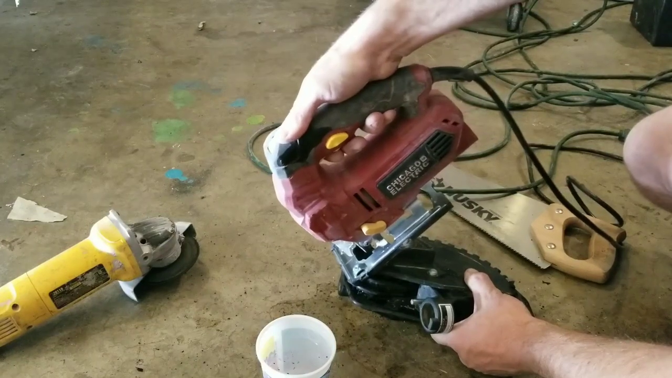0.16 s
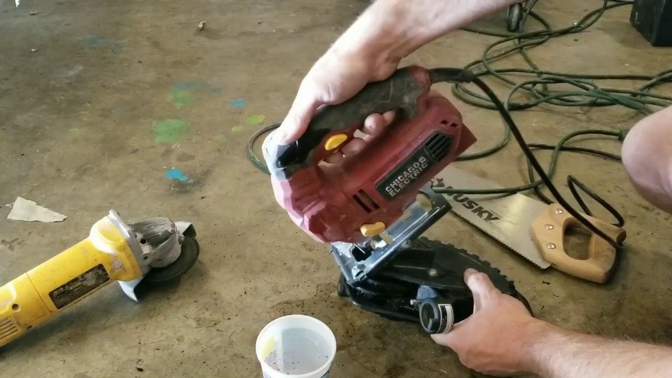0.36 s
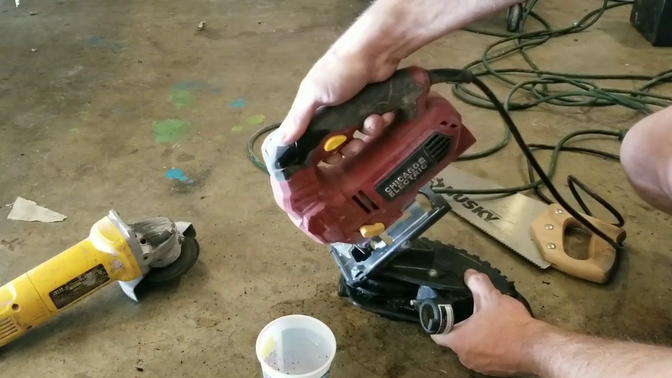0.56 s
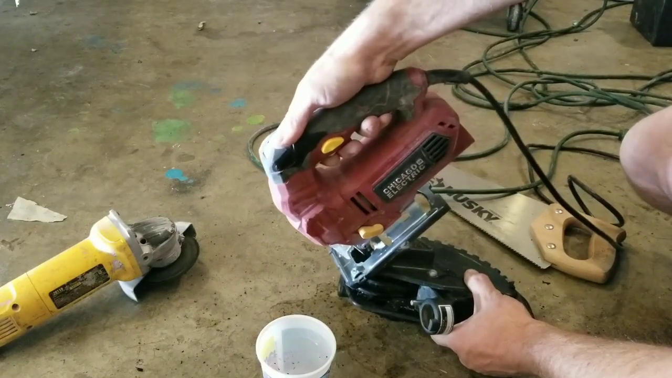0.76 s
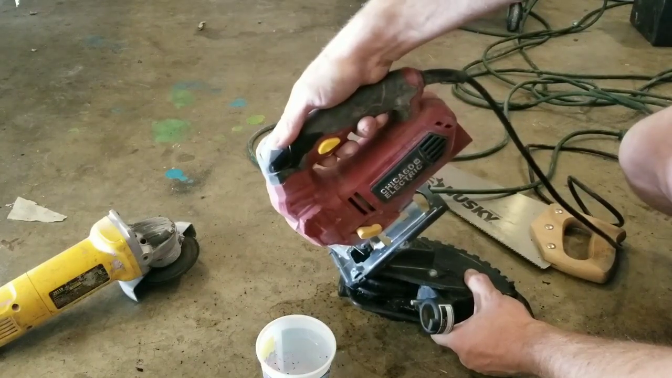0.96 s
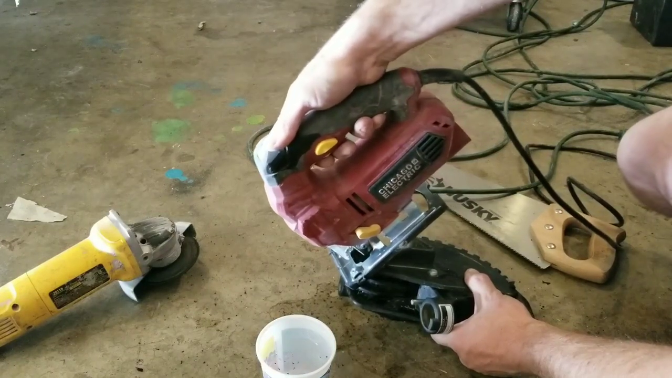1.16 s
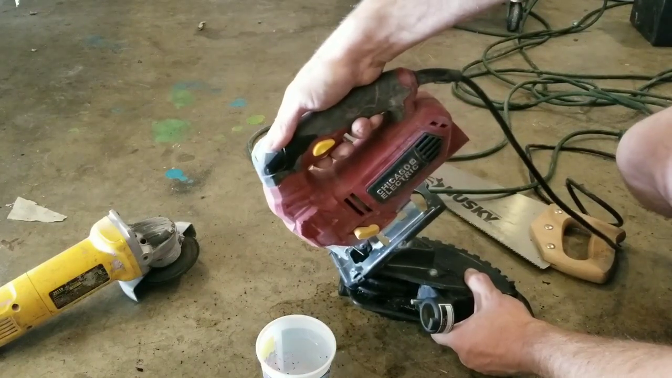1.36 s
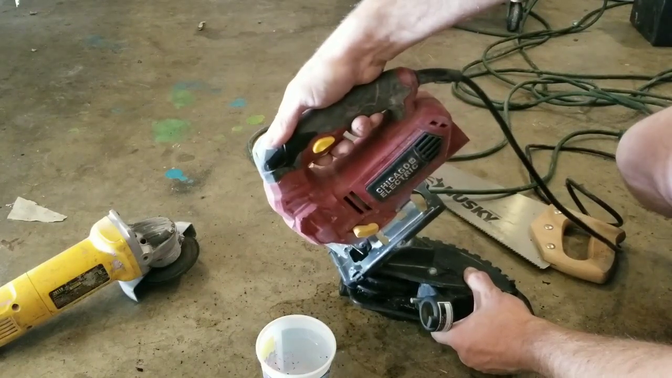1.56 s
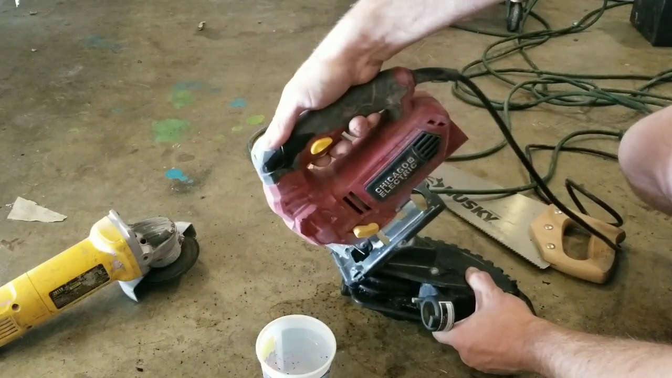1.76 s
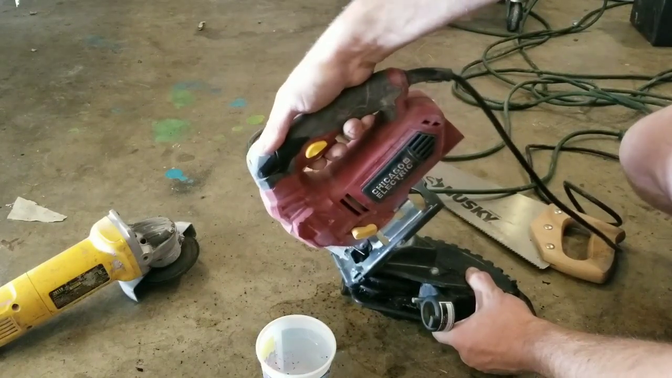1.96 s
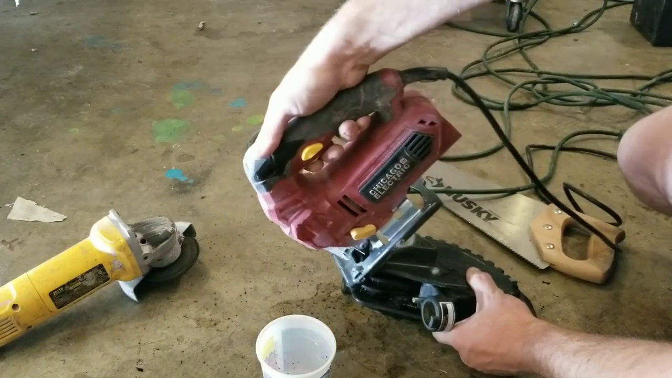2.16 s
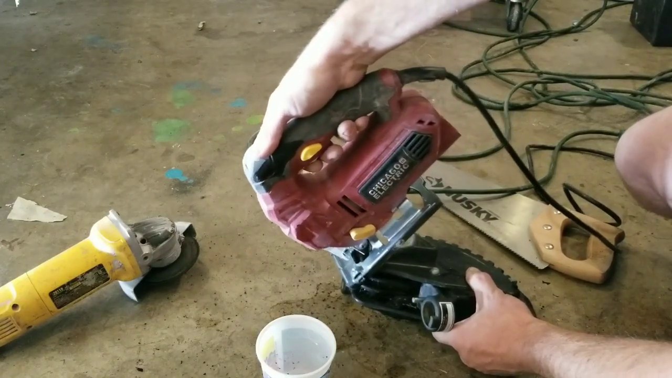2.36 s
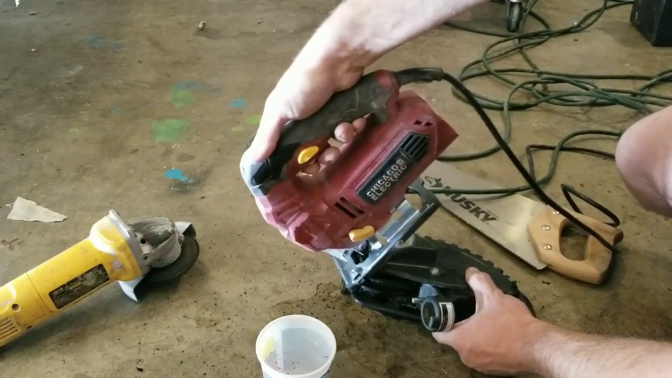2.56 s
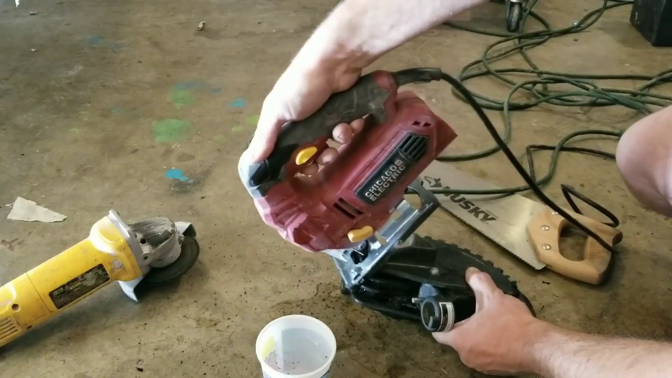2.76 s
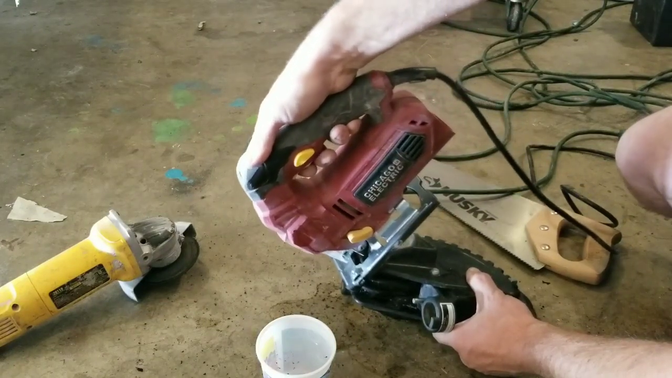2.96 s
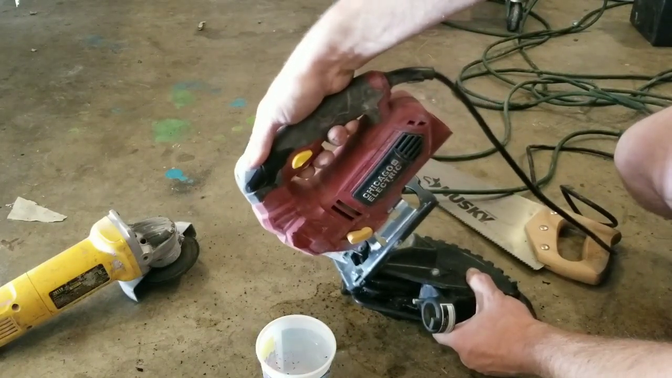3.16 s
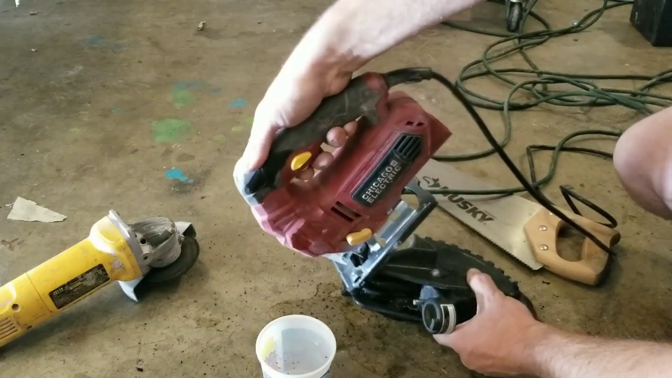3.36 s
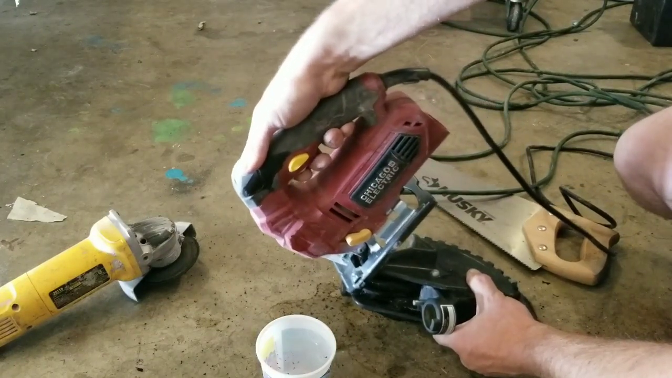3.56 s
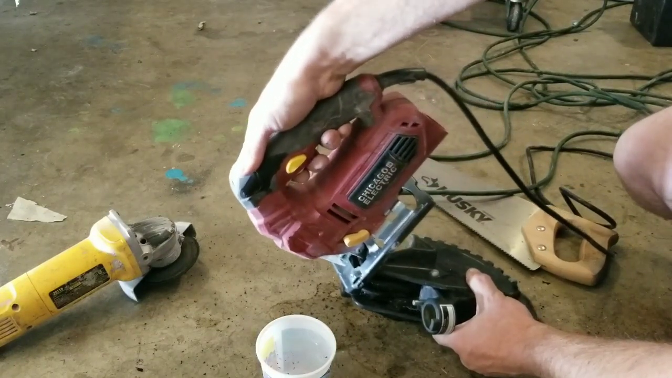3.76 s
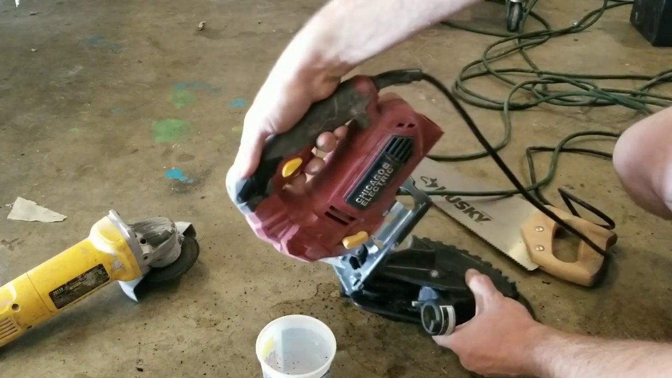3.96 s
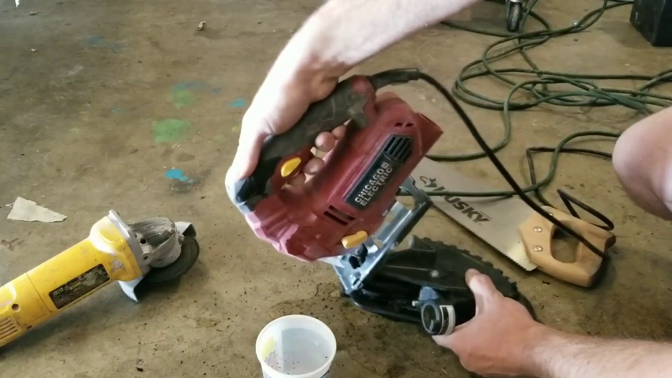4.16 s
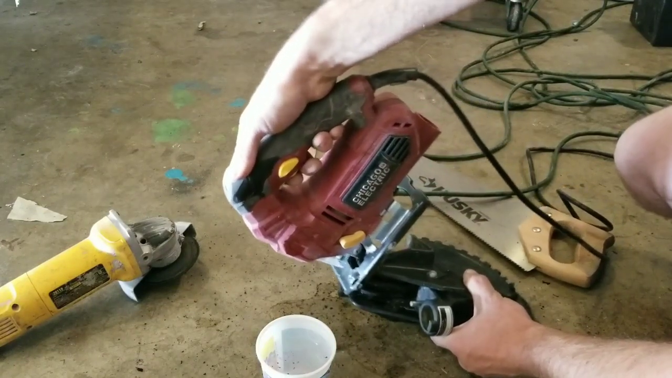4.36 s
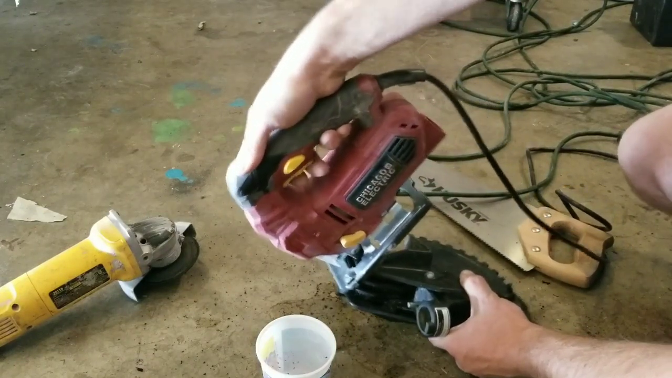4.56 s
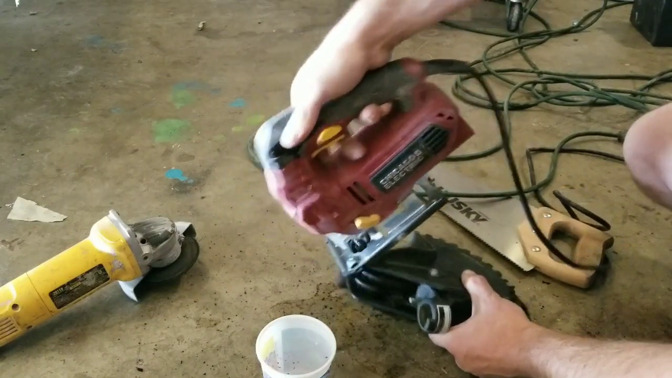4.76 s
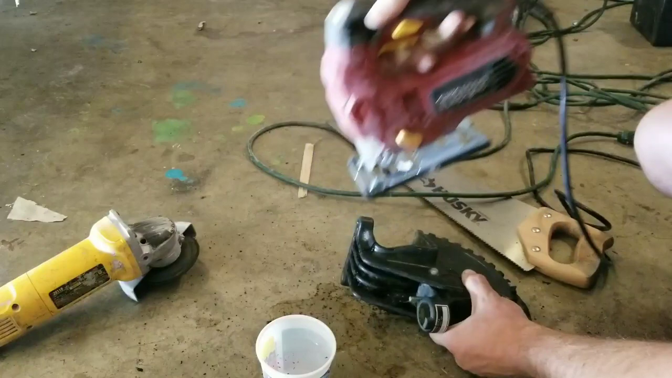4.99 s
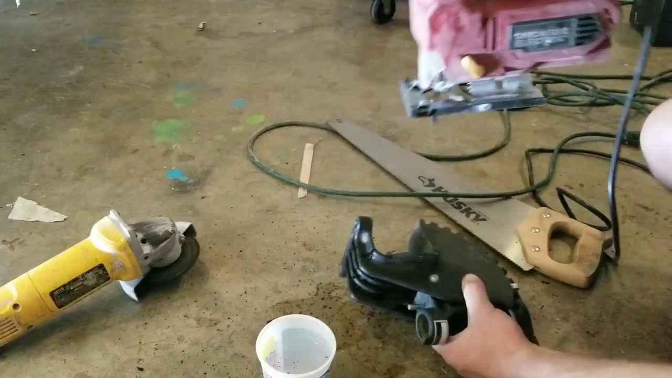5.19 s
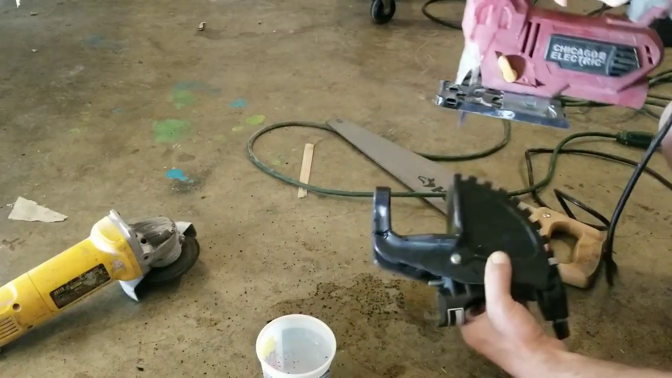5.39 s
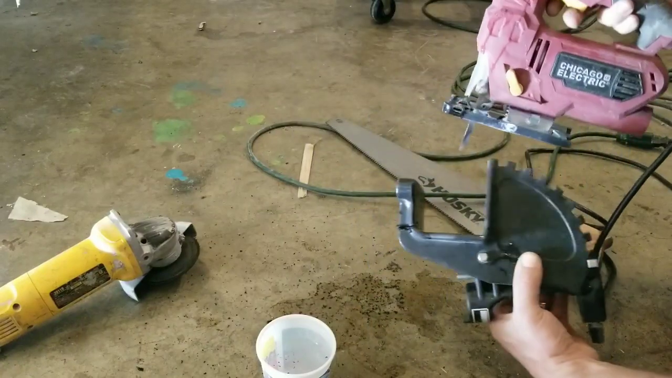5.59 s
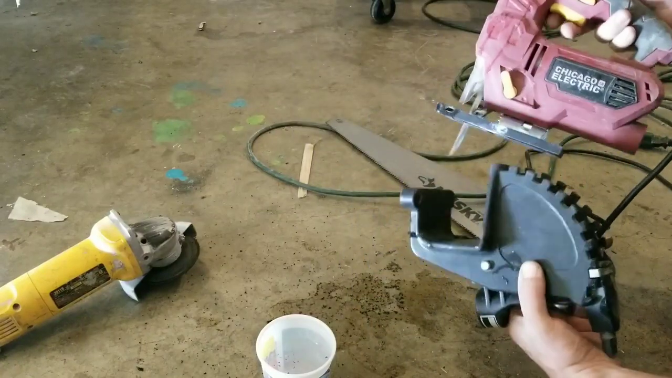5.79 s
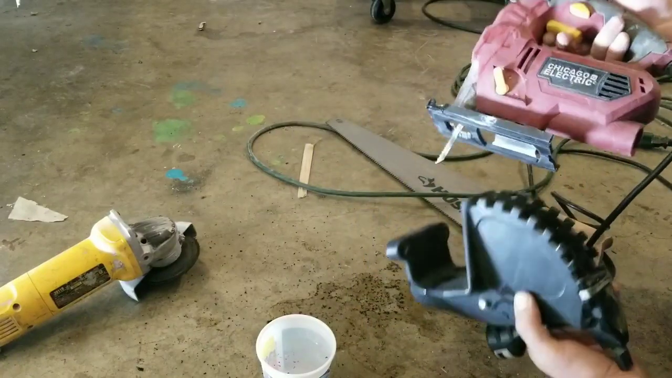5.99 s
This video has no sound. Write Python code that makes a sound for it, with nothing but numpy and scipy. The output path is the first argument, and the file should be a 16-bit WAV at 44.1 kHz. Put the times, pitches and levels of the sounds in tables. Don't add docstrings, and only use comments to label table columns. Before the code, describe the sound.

Close by in a garage with a short reverb, an electric jigsaw grinds through plastic: rapid blade knocks, bright tearing rasp, gear whine and rushing fan air. The labouring motor slows slightly, then a quick burst of hollow slaps and sharp snaps marks the break. The rasp stops and the freed motor coasts down in pitch with an airy whir.

```python
import sys
import numpy as np
from scipy import signal
from scipy.fft import rfft, irfft
from scipy.io import wavfile
from scipy.ndimage import map_coordinates

SR = 44100
rng = np.random.default_rng(int(sys.argv[2]) if len(sys.argv) > 2 else 0)


def generate_wav(signal):
    frames = np.transpose(np.atleast_2d(signal))
    scaled = np.clip(frames, -1, 1) * 32767
    pcm = np.round(scaled).astype(np.int16)
    wavfile.write(sys.argv[1], SR, pcm)


def boost_factor(decibels):
    exponent = np.asarray(decibels, float) / 20
    return 10 ** exponent


N = 265922
ROTOR_TURNS = 9.6

# [f/Hz, level/dB per Hz]
RASP_COLOUR = [(88, -39), (150, -32), (373, -9.5), (500, -14), (912, -9.5), (1660, -4), (1830, -2),
               (2100, -6.5), (2920, -1.5), (5870, -5.5), (7130, -3), (9540, -19), (12500, -5), (15500, -12)]


def rms_one(x):
    return x / np.sqrt(np.mean(x ** 2) + 1e-20)


def in_time(rows):
    s, *columns = np.transpose(rows)
    return [np.interp(np.arange(N) / SR, s, c) for c in columns]


def after(start_s):
    return np.maximum(np.arange(N) / SR - start_s, 0)


def at_hz(points, hz):
    f, level = np.array(points).T
    return np.interp(np.log(hz), np.log(np.maximum(f, 1)), level)


def drift(rate):
    r = np.exp(-80 * np.pi * rate / SR)
    white = rng.standard_normal(N // 40 + 2002)
    slow = signal.lfilter([1], [1, -2 * r, r * r], white)[2000:]
    return np.interp(np.arange(N) / 40, np.arange(len(slow)), rms_one(slow))


def ring(clicks, hz, t60):
    r, w = boost_factor(-60 / (t60 * SR)), 2 * np.pi * hz / SR
    return signal.lfilter([0, np.sin(w)], [1, -2 * r * np.cos(w), r * r], clicks + 1e-18)


def bump(strokes, at, sharp):
    return np.exp(sharp * (np.cos(2 * np.pi * (strokes - at)) - 1))


def banded_noise(spectrum, patchy_db, tilt_db=0):
    # [f/Hz, likeness 0..1]
    likeness = [(60, .98), (300, 0.98), (700, 0.83), (1400, 0.51), (2800, 0.12), (5500, 0.26),
                (15000, 0.042)]
    # [f/Hz, level/dB]
    sideways = [(60, 0.0), (200, 0.7), (500, -.3), (1000, .5), (2000, 2.5), (4000, -2), (8000, 3.5),
                (12000, -.3)]
    out, power = 0, 0
    flicker = patchy_db * drift(8)
    edges = 40 * 2 ** np.arange(0, 8.8, 1 / 3)
    white = rng.standard_normal((2, 2, N))
    for k, (low, high) in enumerate(zip(edges, edges[1:])):
        band_pass = signal.butter(2, [low, high], "band", fs=SR, output="sos")
        mid, side = signal.sosfilt(band_pass, white[k % 2])
        hz = np.sqrt(low * high)
        alike = np.clip(at_hz(likeness, hz), -1, 1)
        lean = at_hz(sideways, hz) / 2
        band = np.sqrt(1 + alike) * mid + np.sqrt(1 - alike) * side * [[1], [-1]]
        band = boost_factor(at_hz(spectrum, hz)) * band
        power += np.mean(band ** 2)
        out = out + band * boost_factor([[lean], [-lean]]) * boost_factor(flicker + tilt_db * np.log2(hz / 2000))
    return out / np.sqrt(power)


def motor_speed():
    # [t/s, speed/strokes per minute]
    loaded = [(0.0, 2433.5), (0.4, 2394.9), (0.8, 2368.3), (1.2, 2358.8), (1.6, 2362.5), (1.9, 2326.9),
              (2.2, 2301.4), (2.6, 2305.7), (3.0, 2285.0), (3.4, 2258.8), (3.8, 2245.2), (4.2, 2238.0),
              (4.45, 2236.5), (4.6, 2242.9), (4.7, 2267.4), (4.76, 1736.1), (4.9, 1626.9)]
    friction_spm_per_s, drag_per_s = 482, 0.374
    offset = friction_spm_per_s / drag_per_s
    coast = np.exp(-drag_per_s * after(loaded[-1][0]))
    return (in_time(loaded)[0] + offset) * coast - offset


def garage(x):
    t = np.arange(SR // 2) / SR
    t60_s, level_db = 0.34, -12.5
    tail = rng.standard_normal((2, len(t))) * boost_factor(-60 * t / t60_s) * (t > 0.002)
    tail = signal.lfilter([0.5], [1, -0.5], tail)
    tail = tail / np.sqrt(np.sum(tail ** 2) / 2)
    return boost_factor(level_db) * signal.fftconvolve(x[None], tail, axes=1)[:, :N]


def low_hum():
    level_db = -52 + 30.5 * (after(0) - N / SR)
    return boost_factor(level_db) * rms_one(ring(rng.standard_normal(N), 96, 0.23))


def cooling_air(decades, feed_db, off):
    # [f/Hz, level/dB per Hz]
    air_colour = [(40, -19), (90, -17), (200, -19.5), (380, -16.5), (540, -11), (780, -4.5), (1350, -2.5),
                  (2400, -2), (4850, -5.5), (7200, -12), (9000, -13), (11000, -15.5), (13500, -10),
                  (15500, -12.5)]
    near_db = 25 * after(5.835)
    level_db = -19 + 29.5 * decades + 0.82 * feed_db * (1 - off) + near_db
    tilt_db = 0.47 + off * (-1.18 - 0.47) + 0.75 * after(4.8)
    return boost_factor(level_db) * banded_noise(air_colour, 0.55, tilt_db)


def shake(strokes, exit_db):
    # [multiple of stroke rate, early level/dB, late level/dB]
    harmonics = [(2, 1, -6), (3, 2, 3), (4, -3, -7), (5, 0, -4), (6, -9, -7), (7, 5, -2), (8, -4, 1),
                 (9, -6, 1), (10, -5, 7), (11, -5, -4), (12, -6, -5)]
    change_s = 2.1
    late = in_time([(change_s - 0.3, 0), (change_s + 0.19, 1)])[0]
    lines = 0
    for k, early_db, late_db in harmonics:
        gain = boost_factor(early_db + late * (late_db - early_db) + 0.87 * drift(2.5))
        lines = lines + gain * np.sin(2 * np.pi * (round(k) * strokes + rng.random()))
    level_db = -41.5 - after(1.8) + exit_db
    return boost_factor(level_db) * rms_one(lines)


def rotor(strokes, spm, decades, off):
    # [f/Hz, level/dB]
    housing = [(600, -25), (3300, -12), (3900, 3), (4600, 1), (5600, -1), (6500, -5), (8800, -18),
               (10500, -10), (12000, 0), (13000, 3), (15000, 6)]
    line_levels = [-25, -22, -18, 2, -11, -18, -6, 0, -10, -10, -12, -2, -3, -8, -12, -6, -8, -8]
    # [speed/strokes per minute, level/dB]
    whine_load = [(2265, -26.5), (2310, -32)]
    turn, whine = 2 * np.pi * ROTOR_TURNS * strokes, 0
    for k, db in enumerate(line_levels):
        multiple = 6 * (k + 1)
        hz = multiple * ROTOR_TURNS * spm / 60
        gain = boost_factor(db + at_hz(housing, hz) + 1.5 * drift(12)) * (hz < 16000)
        whine = whine + gain * np.sin(multiple * turn + k * k)
    whine_db = (1 - off) * at_hz(whine_load, spm) + off * -43.5
    hum = np.sin(turn) + boost_factor(2.5 * drift(2)) * np.sin(2 * turn)
    held_db = -39 - 16 * after(1.9)
    free_db = -47.5 + 39 * decades
    hum_db = (1 - off) * held_db + off * free_db + 2.2 * drift(1.0)
    return boost_factor(whine_db) * whine + boost_factor(hum_db) * hum


def mesh_level(hz, peaks):
    power = sum(boost_factor(db) ** 2 / (1 + ((hz - at) / width) ** 4) for at, width, db in peaks)
    return 10 * np.log10(power + boost_factor(-59) ** 2)


def gears(strokes, spm):
    # [f/Hz, half width/Hz, level/dB]
    gearbox = [(1947, 9, -24.5), (1901, 15, -24.5), (1864, 11, -25.5), (1837, 12, -20.5), (1810, 11, -26),
               (1790, 15, -36), (1270, 110, -32.5), (825, 50, -43)]
    # [f/Hz, half width/Hz, level/dB]
    gearbox_high = [(3862, 22, -29.5), (3782, 22, -32), (3710, 14, -32), (3600, 60, -40), (2600, 300, -50)]
    mesh_hz = 5 * ROTOR_TURNS * spm / 60
    mesh_db, overtone_db = mesh_level(mesh_hz, gearbox), mesh_level(2 * mesh_hz, gearbox_high)
    load = 0.4 + 1.2 * bump(strokes, 0.03, sharp=3.1) + 0.5 * bump(strokes, 0.55, sharp=3.1)
    turn = 2 * np.pi * ROTOR_TURNS * strokes + 0.014 * drift(30)
    mesh = boost_factor(mesh_db + 0.7 * drift(6)) * np.sin(5 * turn)
    overtone = boost_factor(overtone_db + 4) * np.sin(10 * turn)
    return load / load.mean() * (mesh + overtone) * boost_factor(-1.5)


def slaps():
    # [t/s, peak level/dB, ring f/Hz]
    hits = [(4.489, -13, 1380), (4.517, -4.5, 1330), (4.547, -7.5, 1370), (4.573, -6, 1300),
            (4.6, -6.5, 1300), (4.627, -10, 1430), (4.656, -9, 1430), (4.684, -7.5, 1480),
            (4.724, -8, 1380), (4.754, -5.5, 1320), (4.793, -9.5, 1350), (4.859, -16, 1380),
            (4.893, -19, 1290), (4.932, -8, 1370), (4.965, -18, 1270)]
    out, t = np.zeros(N + 4000), np.arange(4000) / SR
    for s, db, hz in hits:
        burst = rng.standard_normal(4001) * boost_factor(-60 * np.r_[0, t] / 0.0065)
        thud = ring(np.diff(burst), 900, 0.01)
        body = np.sin(2 * np.pi * hz * t) * boost_factor(-60 * t / 0.025) * np.minimum(t / 0.0007, 1)
        out[round(s * SR):][:4000] += boost_factor(db - 3) * (body + boost_factor(-1.5) * thud / np.abs(thud).max())
    return out[:N]


def snaps():
    # [t/s, peak level/dB, brightness/dB]
    cracks = [
        (4.71, -18, -23),
        (4.741, -26, -17),
        (4.7716, -12, -12),
        (4.8128, -8, -27),
        (4.8467, -15.5, -21),
        (4.882, -14, -20),
        (4.9171, -12.5, -20),
        (5.928, -31, -13),
        (6.0194, -29, -12),
    ]
    out, t = np.zeros(N + 4000), np.arange(2000) / SR
    for s, db, bright_db in cracks:
        burst = rng.standard_normal(2000) * boost_factor(-60 * t / 0.014)
        dull = ring(burst, 2960, 0.0077) + 1.7 * ring(burst, 4300, 0.0057) + 0.4 * ring(burst, 1320, 0.05)
        spit = boost_factor(bright_db + 5) * np.diff(burst, prepend=0)
        out[round(s * SR):][:2000] += boost_factor(db + 0.5) * (dull / np.abs(dull).max() + spit)
    return out[:N]


def knocks(strokes, modes, level_db):
    at = np.flatnonzero(np.diff(np.floor(strokes + 0.1)) > 0)
    draws, out = rng.standard_normal((len(at), len(modes) + 1)), np.zeros(N)
    at = np.clip(at + (2.0 * draws[:, -1]).astype(int), 0, N - 1)
    for k, (hz, db, t60) in enumerate(modes):
        clicks = np.zeros(N)
        clicks[at] = boost_factor(db + 1.5 * draws[:, k])
        out += ring(ring(clicks, hz, 0.0044), hz, t60)
    return boost_factor(level_db) * rms_one(out)


def blade(strokes, feed_db, exit_db):
    # [f/Hz, level/dB, t60/s]
    long_modes = [(2796, 8.5, 0.024), (3460, -7, 0.017), (1380, -4, 0.068), (927, -7.5, 0.09),
                  (1750, -21, 0.015)]
    # [f/Hz, level/dB, t60/s]
    short_modes = [(3075, 8, 0.04), (2664, -3, .03), (2960, 10, 0.018), (3540, -1, 0.04), (4830, 1, .025)]
    long_db = -26 - 1.5 * after(1) - 15 * np.maximum(0.3 - after(0), 0) + exit_db
    short_db = -27.5 + 20 * np.minimum(after(0) - 1.65, 0) + 0.67 * feed_db + exit_db
    return knocks(strokes, long_modes, long_db) + knocks(strokes, short_modes, short_db)


def tooth_pattern(strokes, level_db):
    patterns = rng.standard_normal((14, 601))
    locked = map_coordinates(patterns, [strokes / 20, strokes % 1 * 600], order=1)
    hz = np.maximum(np.arange(N // 2 + 1) * SR / N, 20)
    colour = boost_factor(at_hz(RASP_COLOUR, hz)) / (1 + (hz / 3500) ** 4)
    return boost_factor(level_db) * rms_one(irfft(rfft(locked) * colour, N))


def catches():
    catch_times = [4.742, 4.776, 4.817]
    t = np.arange(N) / SR
    return sum(8 * np.exp(-((t - s) / 0.012) ** 2) for s in catch_times)


def rasp(strokes, rasp_db):
    tear = bump(strokes, 0.96, sharp=2.7) * boost_factor(3.57 * drift(25))
    rub = bump(strokes, 0.52, sharp=3.0)
    return boost_factor(rasp_db) * rms_one(0.75 + tear + rub) * banded_noise(RASP_COLOUR, patchy_db=0.63)


def scene():
    # [t/s, feed pressure level/dB, kerf grip on the teeth level/dB]
    hand = [
        (0, 0, 5.5),
        (.45, 0.5, 2.5),
        (.75, 0.5, 0.5),
        (1.6, -.5, 2.5),
        (1.95, 0, 4),
        (2.25, -1, 3.5),
        (2.7, -1, -1),
        (3.3, -1, 2.5),
        (3.8, 0, -6),
        (4.68, 1.5, 3),
    ]
    spm = motor_speed()
    decades = np.log10(spm / 2300)
    strokes = 0.33 + np.cumsum(spm / 60) / SR
    off = np.clip(after(4.54) / 0.24, 0, 1)
    feed_db, grip_db = in_time(hand)
    exit_db = -77 * after(4.8)

    air = cooling_air(decades, feed_db, off)
    body = shake(strokes, exit_db)
    tones = rotor(strokes, spm, decades, off) + gears(strokes, spm)
    blows = blade(strokes, feed_db, exit_db) + slaps() + snaps()
    blows += tooth_pattern(strokes, -30 + grip_db + exit_db)
    teeth = rasp(strokes, -20 + feed_db + exit_db - 4.5 * off + catches())
    room = garage(blows + 0.5 * tones)
    return blows + tones + body + low_hum() + room + teeth + air


def top_cut(x):
    return signal.sosfilt(signal.butter(12, 16430, fs=SR, output="sos"), x)


def record(dry):
    ports = np.stack([np.roll(dry[0], shift=2), dry[1]])
    ports = np.tanh(ports / 1.227) * 1.387
    ports = signal.sosfilt(signal.butter(1, 95, "high", fs=SR, output="sos"), ports)
    ports = signal.sosfilt(signal.ellip(14, 0.5, 75, 15560, fs=SR, output="sos"), ports)
    return top_cut(ports)


dry = scene()
out = record(dry)
generate_wav(out)
```